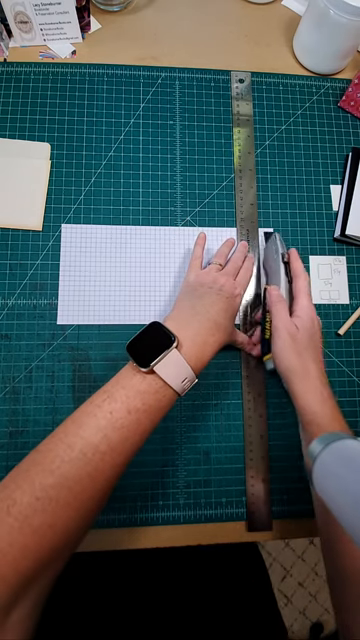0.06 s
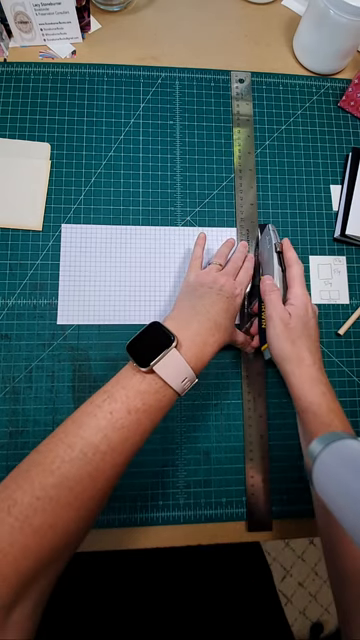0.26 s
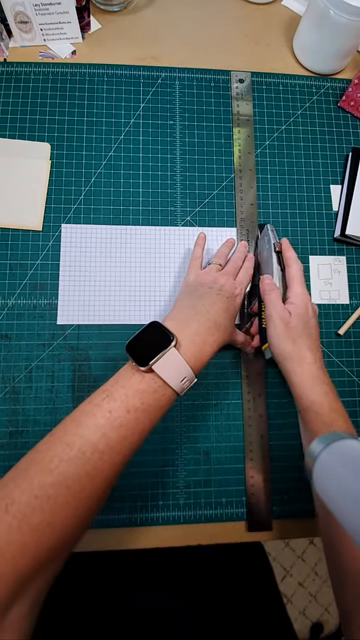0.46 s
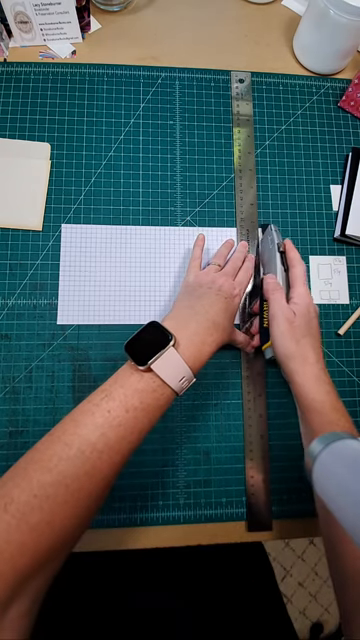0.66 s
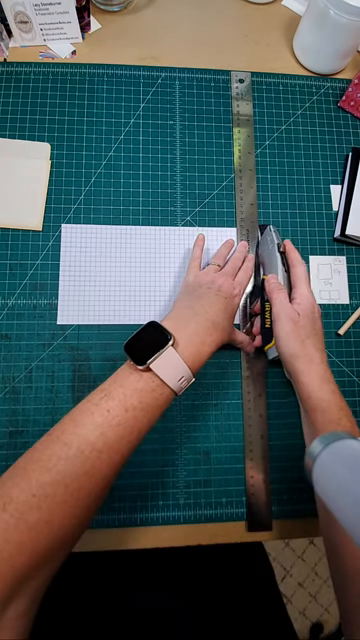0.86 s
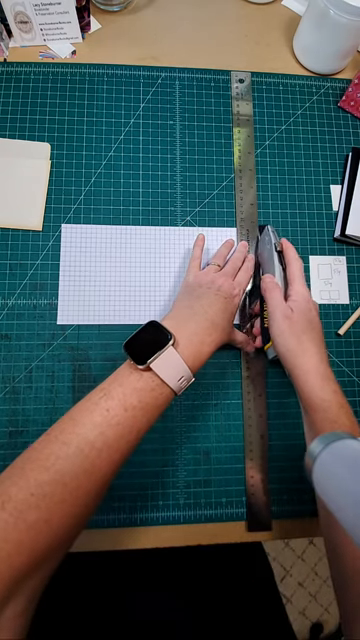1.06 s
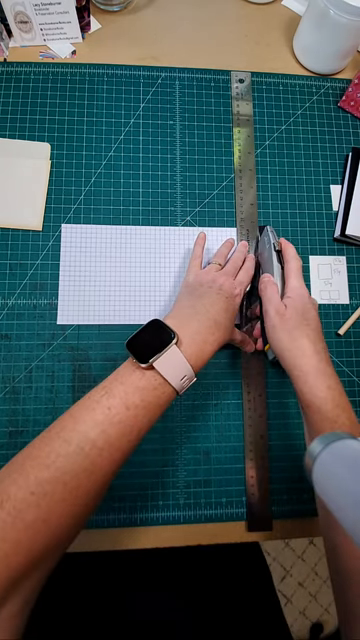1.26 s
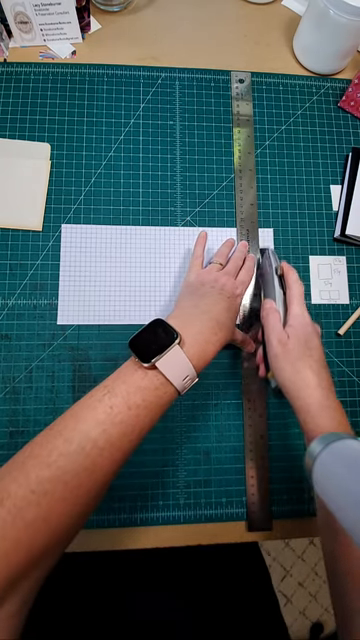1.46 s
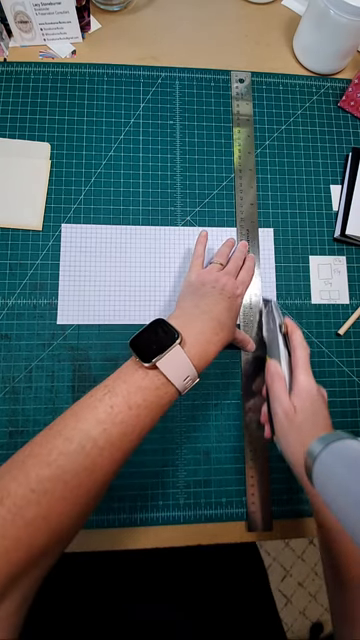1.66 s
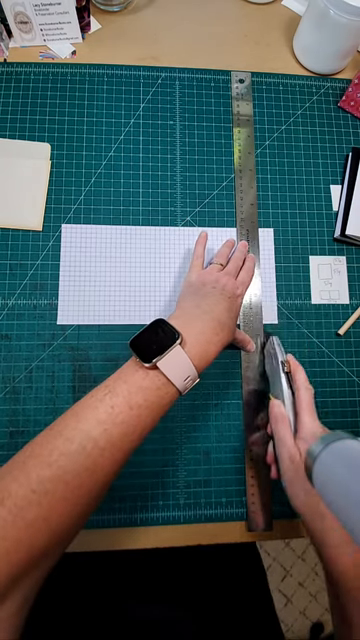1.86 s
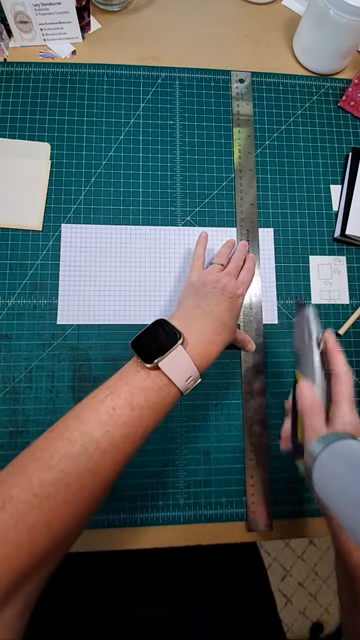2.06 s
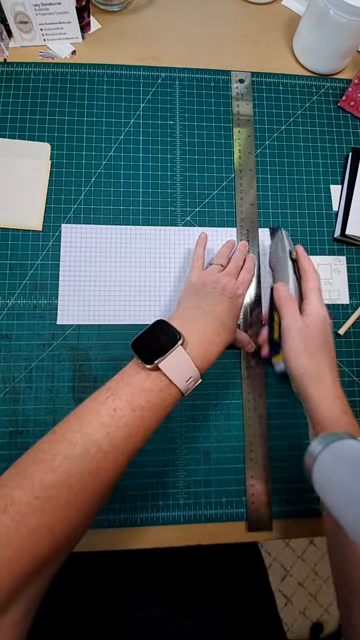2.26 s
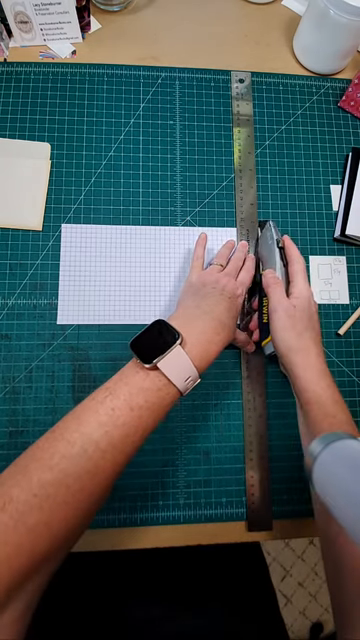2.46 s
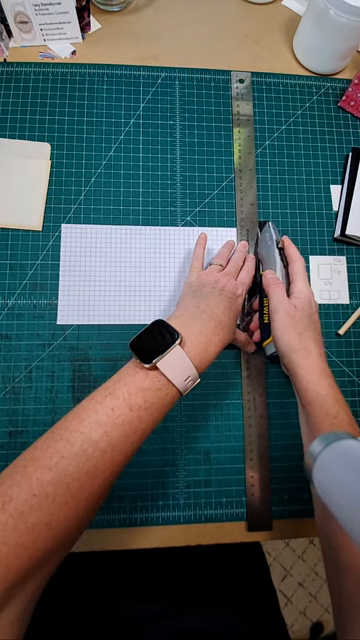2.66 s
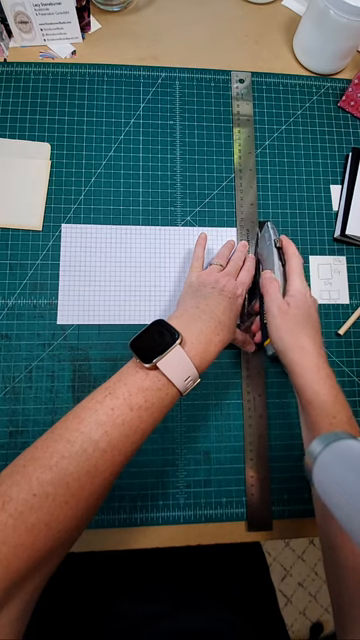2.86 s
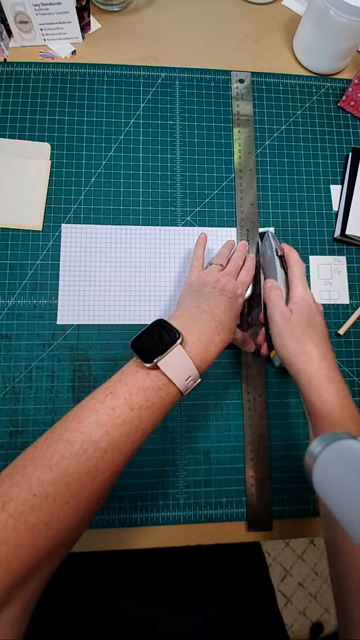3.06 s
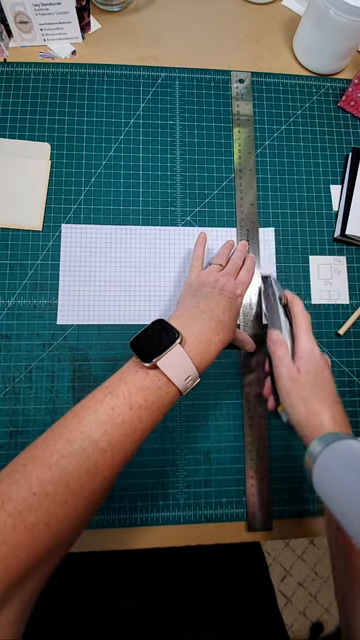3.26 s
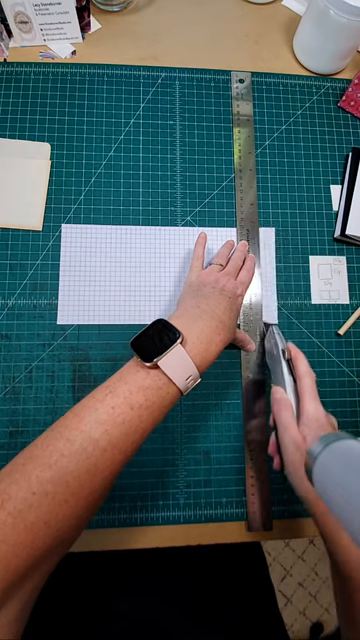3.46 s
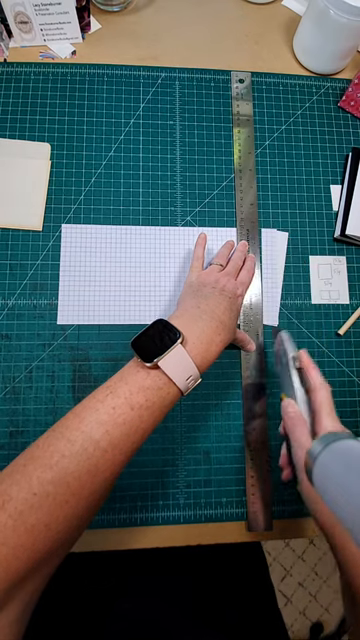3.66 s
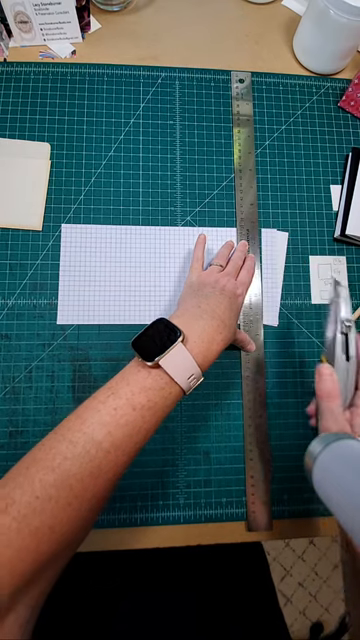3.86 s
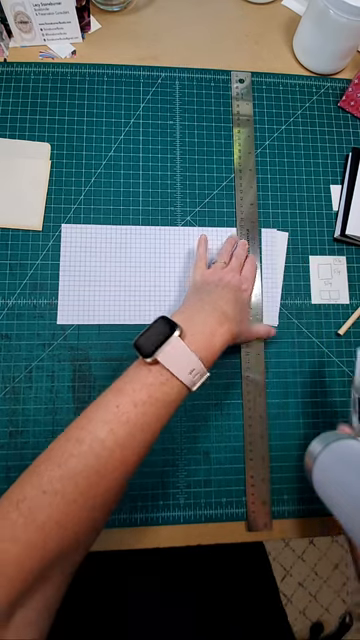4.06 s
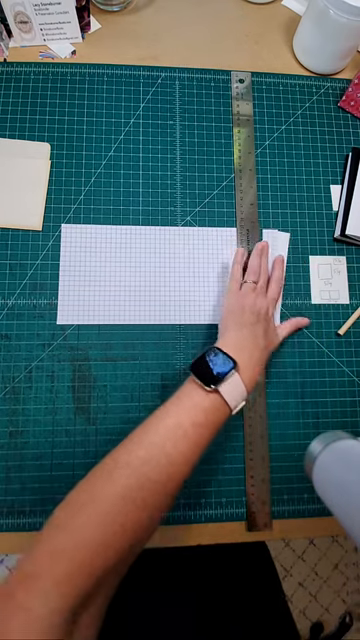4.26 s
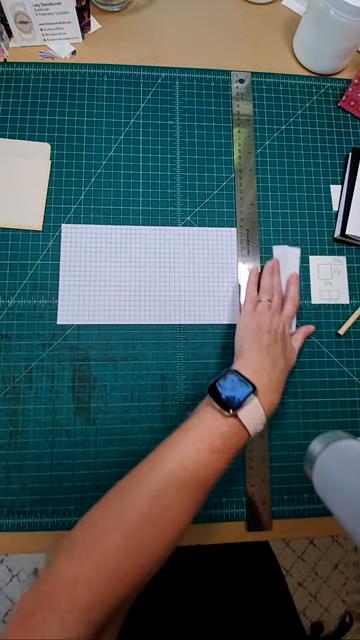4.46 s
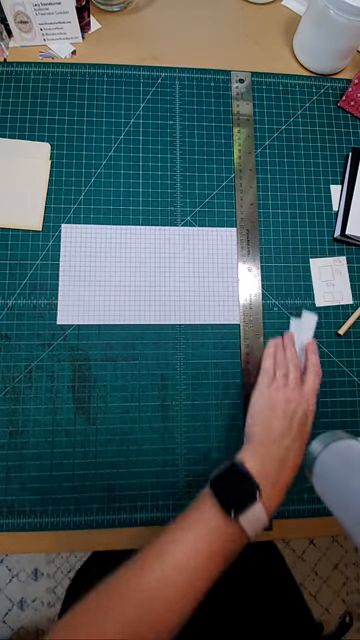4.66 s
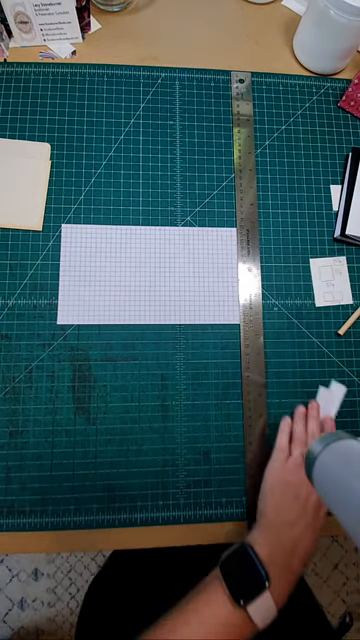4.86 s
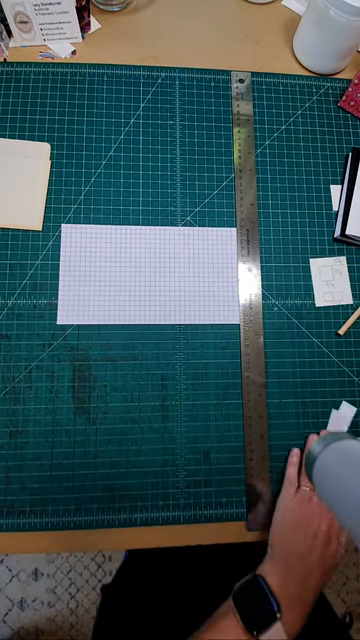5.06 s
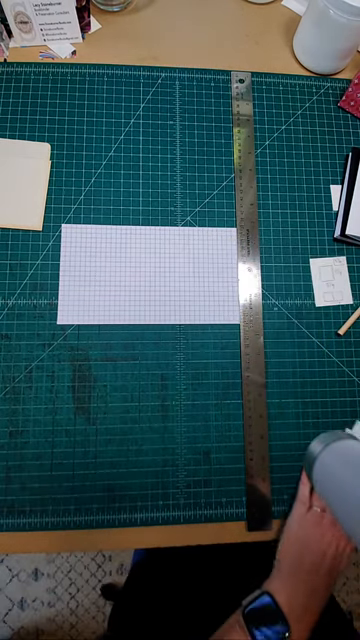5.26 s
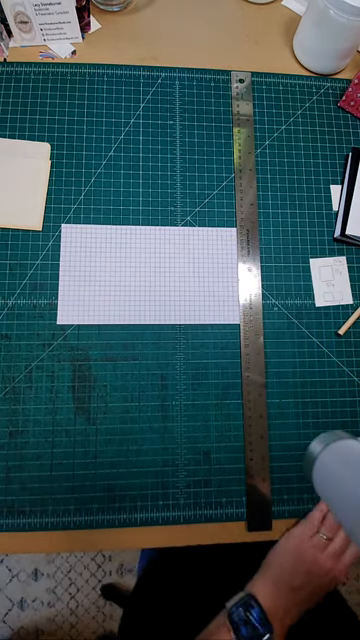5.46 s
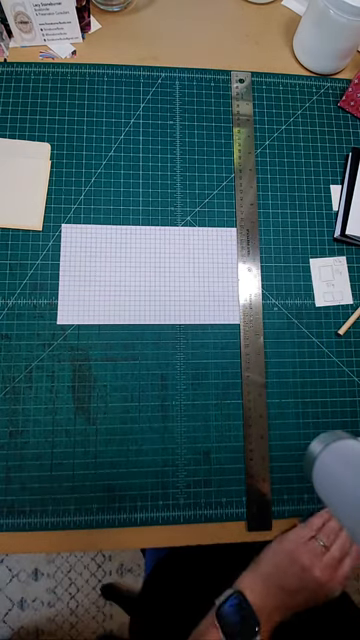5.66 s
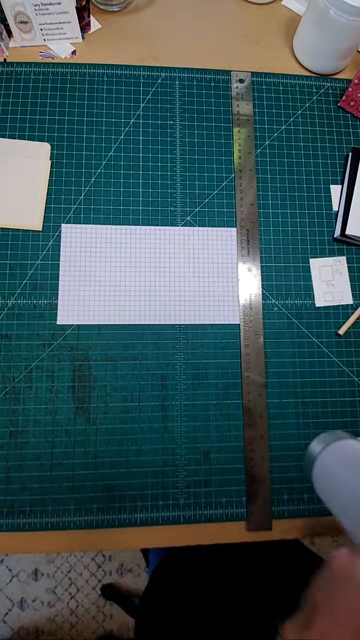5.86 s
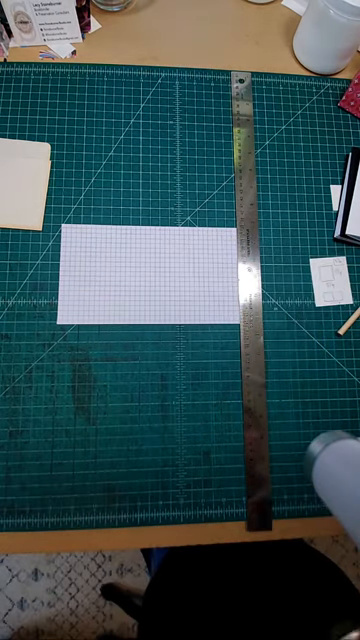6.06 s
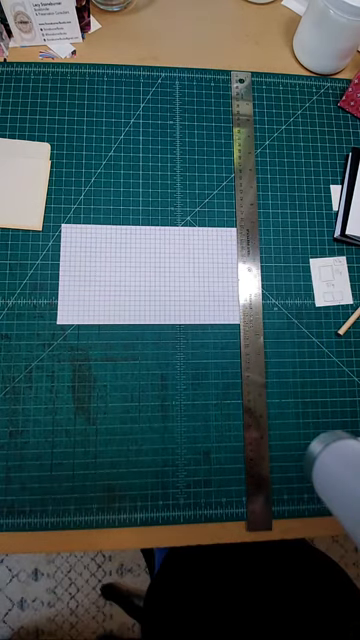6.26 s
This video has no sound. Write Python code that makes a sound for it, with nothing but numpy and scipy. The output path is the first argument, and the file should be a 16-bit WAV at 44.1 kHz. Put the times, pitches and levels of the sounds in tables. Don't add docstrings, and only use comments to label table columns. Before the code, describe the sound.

In a small quiet room, close above a wooden table, a blade ticks on a steel ruler, then makes two brief tearing, ringing strokes through paper. A sharp knock follows the first. Something creaks after the second, an offcut is swept softly off the mat, and hard tool knocks, plastic clacks and steel rattles boom in the tabletop.

```python
import sys
import numpy as np
from scipy import signal
from scipy.fft import rfft, irfft
from scipy.io import wavfile
from scipy.ndimage import uniform_filter1d, map_coordinates

SR = 44100
rng = np.random.default_rng(int(sys.argv[2]) if len(sys.argv) > 2 else 0)


def to_linear_factor(level_db):
    exponent = np.asarray(level_db, float) / 20
    return 10 ** exponent


def file_out(sig):
    cols = np.atleast_2d(sig).T
    lim = np.clip(cols, -1, 1)
    pcm = np.round(lim * 32767).astype(np.int16)
    wavfile.write(sys.argv[1], SR, pcm)


N = 278395
TIME = np.arange(N) / SR

# (frequency [Hz], level [dB], t60 [s])
TABLE_MODES = [(68.5, 4.5, 0.22), (99, -5.5, 0.24), (124, -4.5, 0.15), (146, -4.5, 0.23), (167.1, 0.5, 0.3),
               (185.8, 2.5, 0.22), (250, -2.5, 0.17), (300, -7, 0.21), (345, -10.5, 0.21), (411, -7, 0.17),
               (488.5, -13, 0.15)]
# (frequency [Hz], level [dB])
HOUSING = [(6000, -2), (7000, -8), (7900, -12.5), (9000, -1), (10500, 2), (16300, -8), (17200, -51.5)]


def cutting():
    # (time [s], blade speed [dB], table rumble above it [dB], dryness of tear [dB])
    cuts = [
        [(1.31, -72.5, 10.5, 6), (1.39, -47.5, 1.5, 0), (1.48, -44, 3, -15), (1.55, -41.5, 2, -12),
         (1.63, -40.5, 6, -12), (1.665, -41, 1.5, -1), (1.72, -42, 6, -5), (1.775, -42.5, 7, -9)],
        [(3.012, -64, 7, -2), (3.06, -46, 2.5, 3), (3.13, -44, 0.5, -7), (3.2, -41.5, 3, -9),
         (3.28, -45.5, 5.5, 9), (3.34, -46, 6, 5.5), (3.39, -44, 2.5, 9), (3.44, -48, 11.5, 4),
         (3.55, -76, 9, -3)],
    ]
    # (frequency [Hz], width [Hz], level [dB], flare place along cut [0-1])
    blade_modes = [(1316, 300, 18.5, 0.5), (2084, 290, 10.5, 0.6), (2900, 430, 16.5, 0.38),
                   (3330, 240, 15, 0.89), (3710, 110, 19, 0.98), (4540, 900, 6.5, 0), (6470, 510, 8, 0.4)]
    # (frequency [Hz], width [Hz], level [dB])
    top_modes = [(161, 54, -0.5), (262.7, 21, -1.5), (357, 39, 1), (430, 80, -6), (655, 54, -5.5)]
    # (frequency [Hz], level [dB per Hz])
    fibre = [(950, -29.5), (1300, 6.5), (2000, 3.5), (3500, 3.5), (4600, -11.5), (6800, -12), (7800, -31.5),
             (9000, -15.5), (11500, -2), (16000, -9)]
    flare_db, flare_span, tear_level_db = 5.5, 0.074, -10.5
    tearing = colour(grit(4000, spread_db=3.0, flicker_db=1.5), fibre)
    scrape = grit(3000, spread_db=3.0, flicker_db=2.0)
    along = sum(np.clip((TIME - cut[0][0]) / (cut[-1][0] - cut[0][0]), 0, 1) for cut in cuts) % 1

    steel = 0
    for *mode, place in blade_modes:
        flare = flare_db * np.exp(-((along - place) / flare_span) ** 2) + 2.6 * walk(25)
        steel = steel + drifting(resonate(scrape, [mode])) * to_linear_factor(flare)
    steel = unit(colour(steel, HOUSING))
    body = unit(unit(band(tearing, 1200, 9800)) + 1.7 * steel)
    tear = unit(colour(band(grit(4000, spread_db=2.2, flicker_db=1.6), 3600, 8500), HOUSING))
    drag = band(grit(900, spread_db=-0.5, flicker_db=1.5), 82, 730)
    table = unit(sum(resonate(drag, [mode]) * to_linear_factor(3.25 * walk(17)) for mode in top_modes))
    hiss = unit(treble(tearing))

    out = 0
    for cut in cuts:
        on, (speed_db, table_db, dry_db) = curves(cut)
        hiss_db = -9.5 + 0.67 * np.minimum(table_db, 13)
        layers = body + to_linear_factor(tear_level_db + dry_db) * tear + to_linear_factor(table_db) * table + to_linear_factor(hiss_db) * hiss
        out = out + on * to_linear_factor(speed_db - 2.5) * layers
    return out


def drifting(x):
    drift_share, rate_hz = 0.035, 7
    slide = uniform_filter1d(walk(rate_hz), SR // rate_hz)
    where = np.arange(N) + drift_share * SR / 14 * slide
    return map_coordinates(x, [where], order=1, mode="mirror")


def contacts():
    # (time [s], peak [dB], ring [Hz], bright edge [dB])
    ruler = [(0.4406, -32, 2920, -8), (.628, -32.5, 4770, -4), (0.6356, -33, 2760, -5),
             (0.965, -48.5, 2650, -35), (1.279, -45, 3050, -5), (1.291, -37.5, 5500, -17),
             (1.9438, -33, 3070, -0.5), (1.965, -35, 6800, 2.5), (1.9732, -24.5, 6200, -8),
             (2.631, -38, 4000, -11), (2.646, -40.5, 2900, -19), (2.66, -46, 3160, -18),
             (2.749, -41.5, 2670, -18), (2.835, -23.5, 4200, 0), (2.974, -61, 5400, -19.5),
             (3, -38.5, 3020, 0), (3.005, -27.5, 5530, -8), (3.612, -50, 2260, -10),
             (3.6335, -32.5, 2700, -3), (3.641, -36, 6060, -8), (3.8304, -62, 4200, -19),
             (3.894, -53.5, 4240, -5)]
    # (time [s], peak [dB], ring [Hz], bright edge [dB])
    touches = [(0.1004, -63, 2780, 7.5), (0.2773, -60.5, 3870, 3), (0.409, -66, 2500, -9),
               (1.138, -62, 5300, 0), (1.176, -60, 5140, 2), (1.958, -33.5, 3000, -14),
               (2.0968, -59, 2980, -2), (2.427, -59, 1730, -12.5), (3.755, -54, 1780, -9),
               (5.7218, -42, 2600, -14), (6.087, -42, 3550, -1), (6.217, -63, 2330, 16.5),]
    # (time [s], peak [dB],
    # ring [Hz], bright edge [dB], low clack [dB])
    handle = [(1.7797, -16.5, 2570, -5, -11), (4.353, -19, 6300, -5.5, -12), (4.369, -18.5, 1800, 1.5, -10),
              (4.9491, -23, 1590, 0.5, 0), (4.966, -53, 1620, -6, -3), (5.0544, -38.5, 4000, -1, 2.5),
              (5.072, -42, 2110, 1, -23), (5.078, -18, 4900, -3, -9), (5.14, -49, 2100, -12, 0),
              (5.1755, -44, 1690, -6, 0.5), (5.2068, -28.5, 4150, -1.5, -10), (5.2287, -31.5, 4770, -2, -7),
              (5.2555, -38, 4370, -12, -3), (5.283, -41, 2156, 4, -6), (5.2879, -28.5, 2100, 4, 0.5),
              (5.2954, -34.5, 2100, 6, 6.5), (5.31, -44, 2200, -11, -11), (5.331, -39, 2200, -11, -6),
              (5.336, -26, 2210, -12, -3.5), (5.344, -27.5, 2220, -1.5, -1), (5.356, -15.5, 3630, 1, -7),
              (5.3592, -10.5, 4500, 6.5, -11.5), (5.363, -24, 2350, -8, -19), (5.3665, -28, 5500, -2, -12),
              (5.371, -24.5, 2450, -4, -6), (5.392, -38, 5000, -7, -16), (5.42, -36, 2300, -10, -11),
              (5.5249, -14.5, 2210, -30, -6), (6.0684, -45, 2240, -2, -24)]
    # (time [s], peak [dB], bright edge [dB], low clack [dB])
    steel = [(5.5347, -16.5, 4.5, -6), (5.549, -43, -9, -4), (5.56, -38, -6, -14), (5.582, -31.5, -4, 5),
             (5.6296, -28, -7, -6), (5.6342, -36, -2, -3), (5.639, -27.5, -3.5, -9), (5.644, -39, -8, -5),
             (5.796, -34, -10, -34), (5.8065, -23.5, 4, -7.5), (5.838, -21.5, 4, -8), (5.843, -28, -9, -11)]
    ruler_clack_db, touch_clack_db, steel_hz = -54, -14, 2600
    # rows, broad scrape beside the ring [dB], contact [ms]
    objects = [
        ([(*row, ruler_clack_db) for row in ruler], -0.5, 1.92),
        ([(*row, touch_clack_db) for row in touches], -8, 0.78),
        (handle, -3.5, 3.1),
        ([(s, db, steel_hz, *mix) for s, db, *mix in steel], 4, 1.73),
    ]
    shorter_per_db = 0.5
    return [(*row, broad_db, ms * to_linear_factor(-shorter_per_db * (row[1] + 30.5)))
            for rows, broad_db, ms in objects for row in rows]


def ticks():
    out, t, lead_s = np.zeros(N), TIME[:3000], 0.01
    since = t - lead_s
    for s, db, hz, edge_db, clack_db, broad_db, ms in contacts():
        contact_s = max(ms, 0.2) / 1000
        before = 0.14 * np.exp(since / (2.6 * contact_s))
        after = np.exp(-since / (0.75 * contact_s)) + 0.29 * np.exp(-since / (6.1 * contact_s))
        chatter = rng.standard_normal(len(t)) * np.where(since < 0, before, after)
        chatter[int(lead_s * SR)] += 3.5
        broad = 0.6 * to_linear_factor(broad_db) * unit(band(chatter, 1670, 6100))
        part = broad + 0.68 * unit(resonate(chatter, [(hz, hz / 5.7, 0)]))
        snap = chatter * (np.abs(since) < 0.0015)
        edge = treble(snap, top_hz=17730) + treble(chatter - snap)
        add(out, s - lead_s, part, db)
        add(out, s - lead_s, edge, db + edge_db)
        add(out, s - lead_s, -band(chatter, 970, 1460), db + clack_db)
    return colour(out, HOUSING)


def sweeping():
    # (time [s], speed [dB], lightness [dB], hollow tone muffled [0-1], edge hiss [dB])
    sweep = [
        (4.39, -47, -7, 0.1, -14),
        (4.46, -55, 2, 0, -1),
        (4.52, -55, -0.5, 0.5, 13.5),
        (4.565, -56.5, 3.5, 0.7, -1),
        (4.6, -51, 5, .95, -16),
        (4.65, -51, 2.5, 0, 4.5),
        (4.75, -52, -1.2, 0, -34),
        (4.81, -56, 0, 0, -14),
        (4.94, -53.5, 1.5, 0, -19),
    ]
    # (start [s], length [s], level [dB], lightness [dB])
    rustles = [(4.95, 0.014, -44, -2), (5.0, 0.31, -76, 14.5), (5.2, 0.066, -61, -2.5),
               (5.29, 0.035, -62, 5), (5.37, 0.072, -53.5, 0.5), (5.46, 0.063, -58, -5),
               (5.54, .11, -56.5, -5.5), (5.745, 0.069, -55, 3.5), (5.81, 0.06, -55.5, -4.5),
               (5.9, 0.16, -70.5, 4.5), (6.075, 0.085, -60.5, 5.5), (6.2, 0.085, -67.5, -1),
               (.1, 0.12, -84.5, 7), (1.17, 0.035, -84, 11), (3.9, 0.07, -76.5, 4), (4.08, 0.051, -80, -4),
               (4.27, 0.07, -76, 7.5)]
    # (frequency [Hz], level [dB per Hz])
    paper = [(300, 2.5), (480, 2.5), (700, -3.5), (980, -6.5), (1600, -0.5), (2600, -6), (5500, -4),
             (7700, -9.5), (9000, -3.5), (11500, 11.5), (16000, 12.5)]
    on, (speed_db, light_db, muffled, edge_db) = curves(sweep)
    slide = rasp(on * to_linear_factor(speed_db), light_db, paper, patchy_db=1.0, slips=6100, spread_db=3.5)
    slide = slide - np.clip(muffled, 0, 1) * resonate(slide, [(900, 900, 0)])
    slide = slide + to_linear_factor(edge_db) * resonate(slide, [(9300, 1500, 0)])
    crackle = rasp(*strokes(rustles), paper, patchy_db=2.5, slips=1700, spread_db=2.5)
    return to_linear_factor(-3.0) * (slide + crackle)


def thuds():
    # (time [s], peak [dB], favoured pitch [Hz], woody knock [dB], late boom [dB])
    blows = [(0.094, -55.5, 91, -10.5, -8.5), (0.443, -47.5, 97, -18, -7), (0.63, -69.5, 479, 5, -9),
             (0.966, -56, 168, -13, -15), (1.283, -49, 191, -6.5, -17), (1.777, -25.5, 164, -1, -12),
             (1.803, -30.5, 135, -25, -13), (1.867, -45.5, 233, -24.5, -16), (1.95, -55, 172, -4, -10),
             (2.434, -57.5, 147.5, -10.5, -15.5), (2.626, -54, 171, -7, -4.5),
             (2.751, -45.5, 161, -22, -9.5), (2.835, -56.5, 257, 4, -20), (3.005, -44.5, 177, -1, -13),
             (3.405, -32, 358, -25, -12), (3.441, -34, 150.6, -11, -32), (4.238, -43, 147.5, -30, -9),
             (4.282, -54.5, 96, -29, -2.5), (4.351, -24.5, 250, 2, -6.5), (4.369, -29, 190.2, -28, -10),
             (4.948, -26.5, 250, 2, -5), (5.015, -36, 250, -12, -11), (5.078, -47, 155, -19, -5),
             (5.526, -24.5, 250, 6.5, -12.5), (5.58, -27.5, 249, -1.5, -5), (5.601, -33.5, 183, -10, -6),
             (5.641, -51, 176, -4, -14), (5.717, -39.5, 250, -5, -7), (5.795, -37, 250, -5.5, 0.5),
             (5.833, -30.5, 247, 0, -2), (5.974, -47.5, 250, -10, -1), (6.014, -41.5, 179.6, -13, -0.5),
             (6.062, -34, 254, -5.5, -8), (6.17, -46, 250, -28, -1.5), (6.235, -44, 178, -6, 5),
             (6.266, -43, 250, -4, 9)]
    boom_mode, boom_late = (114.9, 0, 0.14), 2.1
    near_knock_hz, far_knock_hz, far_from_s = 345, 405.7, 4.3
    out, t = np.zeros(N), TIME[:6000]
    modes_hz, count = np.transpose(TABLE_MODES)[0], len(TABLE_MODES)
    for s, db, hz, knock_db, boom_db in blows:
        decay_share = max(1 - 0.01 * (db + 25), 0.1)
        gains = to_linear_factor(0.5 * rng.standard_normal(count) - 6.2 * np.abs(np.log2(modes_hz / hz)))
        phases = np.pi * rng.standard_normal(count)
        body = ring([*TABLE_MODES, (hz, 9.5, 0.13)], [*gains, -1], decay_share, [*phases, 0], late=0.93)
        add(out, s, band(body, 96, 1200), db)
        add(out, s, ring([boom_mode], [1], decay_share, late=boom_late), db + boom_db)
        knock_hz = far_knock_hz if s > far_from_s else near_knock_hz
        burst = band(rng.standard_normal(len(t)) * np.exp(-t / 0.0089), 323, 700)
        tone = ring([(knock_hz, 0, 0.085)], [1], late=0.92)[:len(t)]
        add(out, s, unit(burst) + 1.07 * unit(tone), db + knock_db)
    return out


def ringing_parts():
    # (time [s], peak [dB], pitch [Hz], t60 [s], looseness [0-4])
    rings = [(1.051, -65.5, 1048, 0.09, .5), (1.071, -68, 1260, 0.054, 0.54), (2.841, -53, 1086, 0.14, 3.2),
             (1.78, -27, 345, 0.098, 0.33), (1.777, -20, 162.4, 0.11, 0.24), (1.796, -30, 250, 0.15, 0.31),
             (2.75, -50, 2760, 0.093, 2.7), (2.974, -67, 6840, 0.047, .6), (2.974, -63, 4040, 0.055, 0.54),
             (2.838, -49, 2110, 0.28, 2.7), (2.647, -53.5, 394, 0.079, 0.47), (3.757, -64, 1360, 0.12, .8),
             (4.15, -57.5, 82.8, 0.27, 1.3), (4.352, -31, 638, 0.1, 0.59), (4.37, -35, 72, 0.25, 0.68),
             (5.289, -36.5, 2140, 0.076, 1.4), (5.295, -35, 1124, 0.17, 0.39), (5.312, -54, 1160, 0.3, .6),
             (5.335, -32, 1170, 0.15, 0.69), (5.411, -41, 4580, 0.12, 3), (5.342, -52, 1170, 0.082, .8),
             (5.367, -38, 1090, 0.083, 0.51), (5.41, -53, 1370, .07, 1.5), (5.533, -24, 2550, 0.11, 1.7),
             (5.582, -36, 2630, 0.066, 1.5), (5.582, -36, 1187, 0.028, 0.54),
             (5.632, -33.5, 2680, 0.045, 3), (5.723, -46, 2600, 0.039, 1.2), (5.796, -39, 2600, 0.045, 1.3),
             (5.809, -27.5, 2610, 0.053, .45), (5.836, -33, 2590, 0.11, 0.5),
             (5.88, -44, 2640, 0.078, 0.29)]
    # (pitch ratio [1], level [dB])
    part_modes = [(.945, -5), (1, 6), (1.022, 12.5), (1.06, -17.5)]
    rattle_share = 0.13
    out = np.zeros(N)
    for s, db, hz, t60, loose in rings:
        gains = to_linear_factor(5.2 * rng.standard_normal(len(part_modes)))
        tone = ring([(hz * ratio, mode_db, t60) for ratio, mode_db in part_modes], gains, late=0.7)
        width = int(SR / (rattle_share * hz)) + 1
        rattle = unit(uniform_filter1d(rng.standard_normal(SR // 3), width))
        add(out, s, (1 + loose * rattle) * tone, db)
    return out


def creaks():
    # (time [s], lower pitch [Hz], upper pitch [Hz], level [dB], upper share [dB])
    glides = [
        [(3.635, 398.3, 561, -73, 13), (3.665, 427, 615, -51.5, -5), (3.7, 431, 655, -59.5, 7.5),
         (3.75, 423, 687, -68, 1), (3.8, 386.5, 694, -75, -17), (3.88, 345, 630, -76, -4)],
        [(5.42, 300, 645, -61, -21), (5.44, 337, 658, -42.5, -6), (5.48, 358, 736, -44.5, -11),
         (5.525, 377, 734, -36, 0), (5.585, 380, 722, -58, -5)],
    ]
    roughness = [.12, .029]
    out = 0
    for glide, rough in zip(glides, roughness):
        on, (low_hz, high_hz, db, share_db) = curves(glide)
        for hz, gain_db in ((low_hz, db), (high_hz, db + share_db)):
            phase = 2 * np.pi * np.cumsum(hz * (1 + rough * walk(260))) / SR
            out = out + on * to_linear_factor(gain_db + 26 * rough * walk(90)) * np.sin(phase)
    return out


def hands():
    # (start [s], length [s], level [dB], lightness [dB])
    shifts = [(0., 0.021, -80, -1), (.27, 0.039, -79.5, 0), (1.85, 0.052, -75, -3), (1.955, 0.052, -62, -8),
              (2.15, 0.053, -90, -9), (2.21, 0.1, -86, -7.5), (2.43, 0.011, -80.5, -13.5),
              (2.617, 0.073, -70, -7), (2.86, 0.14, -76, -1), (3.63, 0.17, -80.5, -10),
              (3.98, 0.15, -86.5, 8.5), (5.67, 0.21, -74.5, 17.5)]
    # (frequency [Hz], level [dB per Hz])
    skin = [(300, 7), (600, 0), (1100, 4.5), (2000, -1.5), (2800, -3.5), (5400, -17), (7900, -46),
            (10500, -34), (16000, -43)]
    # (time [s], rumble [dB])
    leaning = [(0., -69), (.5, -67.5), (.9, -86), (1.3, -62), (1.9, -53), (2.25, -84.5), (3., -62.5),
               (3.5, -56), (4., -80.5), (4.4, -60), (4.7, -84), (5.04, -36), (5.15, -78), (5.5, -45.5),
               (5.8, -48.5), (5.96, -56), (6.06, -59), (6.31, -50.5)]
    rub = rasp(*strokes(shifts), skin, patchy_db=5, slips=3800, spread_db=4.0)
    return to_linear_factor(-4.5) * (rub + to_linear_factor(np.interp(TIME, *np.transpose(leaning))) * rumble())


def rumble():
    push = rng.standard_normal(N) * to_linear_factor(0.63 * walk(9.9))
    return unit(resonate(push, [(hz, 25, db) for hz, db, _ in TABLE_MODES]))


def room_air():
    # (frequency [Hz], level [dB per Hz])
    air_spectrum = [(15, -41), (25, -6), (64, 4.5), (92, 5.5), (141, -17), (293, -15.5), (607, -22.5),
                    (988, -25.5), (2160, -29), (5430, -35.5), (7710, -42), (11300, -31), (16000, -35.5)]
    return to_linear_factor(-69.5) * unit(colour(rng.standard_normal(N), air_spectrum))


def appliance_hum():
    return to_linear_factor(-82.5) * unit(resonate(rng.standard_normal(N), [(185, 6.1, 0)]))


def room(x):
    # (frequency [Hz], t60 [s])
    room_decay = [(150, 0.39), (1000, 0.28), (3000, 0.28), (8000, 0.22), (15000, 0.18)]
    level_db, onset_s = -10, 0.0018
    t, tail = TIME[:SR // 2], 0
    hz, t60 = np.transpose(room_decay)
    for centre_hz in 90 * 2.0 ** np.arange(8):
        decay_s = np.interp(np.log(centre_hz), np.log(hz), t60)
        octave = band(rng.standard_normal(len(t)), centre_hz / 2 ** 0.5, centre_hz * 2 ** 0.5)
        tail = tail + octave * np.exp(-np.log(1000) * t / decay_s)
    tail *= np.clip(t / onset_s, 0, 1)
    return to_linear_factor(level_db) * signal.fftconvolve(x, tail / np.sqrt(np.sum(tail ** 2)))[:N]


def rasp(gain, light_db, spectrum, patchy_db, slips, spread_db):
    fine = colour(grit(slips, spread_db, flicker_db=-1.5), spectrum)
    low = unit(band(fine, 300, 2200) * to_linear_factor(patchy_db * walk(18)))
    mid = unit(band(fine, 2200, 8000) * to_linear_factor(patchy_db * walk(18)))
    hiss = unit(treble(fine) * to_linear_factor(patchy_db * walk(30)))
    return gain * (to_linear_factor(-3.0 - 1.81 * light_db) * low - mid + to_linear_factor(light_db) * hiss)


def strokes(rows):
    rise_s, fade_s = 0.0048, 0.02
    gain, light = np.full(N, 1e-9), 0
    for s, length_s, db, light_db in rows:
        fade = np.exp(-np.maximum(TIME - s - length_s, 0) / fade_s)
        shape = to_linear_factor(db) * np.clip((TIME - s) / rise_s, 0, 1) * fade
        gain = gain + shape
        light = light + shape * light_db
    return gain, light / gain


def grit(rate, spread_db, flicker_db):
    slips = (rng.random(N) < rate / SR) * rng.standard_normal(N) * to_linear_factor(spread_db * rng.exponential(size=N))
    return unit((unit(slips) + 1.42 * rng.standard_normal(N)) * to_linear_factor(flicker_db * walk(60)))


def ring(modes, gains, scale=1, phases=None, late=0):
    t, out = TIME[:SR // 3], 0
    phases = np.zeros(len(modes)) if phases is None else phases
    for (hz, db, t60), gain, phase in zip(modes, gains, phases):
        arrival_s = 1e-9 + late * 0.0082 * (250 / hz) ** 0.64
        swell = 1 - np.exp(-(t / arrival_s) ** 2)
        decay = np.exp(-np.log(1000) * t / (t60 * scale))
        out = out + gain * to_linear_factor(db) * swell * np.sin(2 * np.pi * hz * t + phase) * decay
    return out


def resonate(x, peaks):
    out = 0
    for k, (hz, width_hz, db) in enumerate(peaks):
        peak = signal.lfilter(*signal.iirpeak(hz, hz / max(width_hz, 10), SR), x)
        out = out + (-1) ** k * to_linear_factor(db) * peak
    return out


def colour(x, points):
    hz, db = np.transpose(points)
    grid_hz = np.maximum(np.arange(2049) * SR / 4096, 1)
    ceps = irfft(np.interp(np.log(grid_hz), np.log(hz), db) * np.log(10) / 20)
    ceps[1:2048] *= 2
    ceps[2049:] = 0
    return signal.oaconvolve(x, irfft(np.exp(rfft(ceps))))[:len(x)]


def band(x, lo_hz, hi_hz):
    return signal.sosfilt(signal.butter(2, [lo_hz, hi_hz], "band", fs=SR, output="sos"), x)


def below(x, top_hz, stop_db=50):
    return signal.sosfilt(signal.ellip(8, 0.2, stop_db, top_hz, fs=SR, output="sos"), x)


def treble(x, top_hz=15800):
    return below(signal.sosfilt(signal.butter(4, 7800, "high", fs=SR, output="sos"), x), top_hz)


def unit(x):
    return x / np.sqrt(np.mean(x ** 2))


def curves(table):
    s, *columns = np.transpose(table)
    inside = uniform_filter1d(1.0 * ((TIME > s[0]) & (TIME < s[-1])), 400)
    return inside, [np.interp(TIME, s, column) for column in columns]


def walk(rate_hz):
    hold = int(SR / rate_hz)
    return uniform_filter1d(np.repeat(rng.standard_normal(N // hold + 1), hold), hold)[:N]


def add(out, s, x, db):
    i = int(s * SR)
    x = x[:N - i]
    out[i:i + len(x)] += x * to_linear_factor(db) / np.abs(x).max()


def scene():
    sharp, parts = ticks(), ringing_parts()
    low = band(parts, 40, 500)
    near = cutting() + sweeping() + parts - low + creaks()
    blows = thuds() + low
    echoes = room(near + sharp + to_linear_factor(-8) * blows)
    rest = near + blows + echoes + hands() + room_air() + appliance_hum()
    return (sharp + below(rest, 15800))[None]


def band_limit(x):
    return signal.sosfilt(signal.butter(12, 16990, fs=SR, output="sos"), x)


def record(dry):
    desk_hz, desk_q, desk_share = 890, 3.7, 0.3
    mix = signal.sosfilt(signal.butter(3, 55, "high", fs=SR, output="sos"), dry)
    mix = mix - desk_share * signal.lfilter(*signal.iirpeak(desk_hz, desk_q, SR), mix)
    mix = below(mix, 16500, stop_db=60)
    return band_limit(mix)


dry = scene()
out = record(dry)
file_out(out)
```